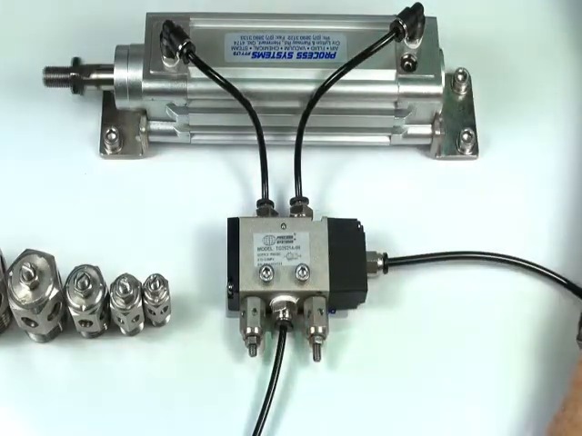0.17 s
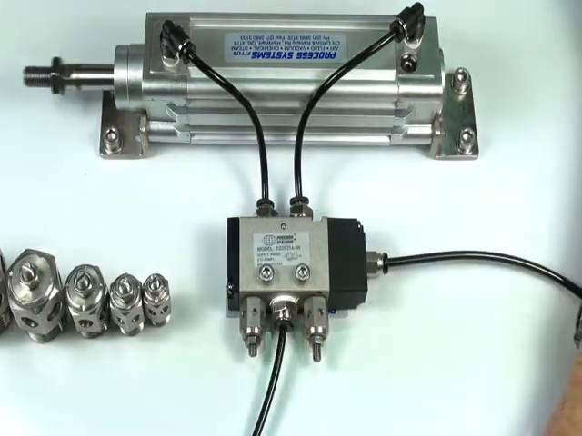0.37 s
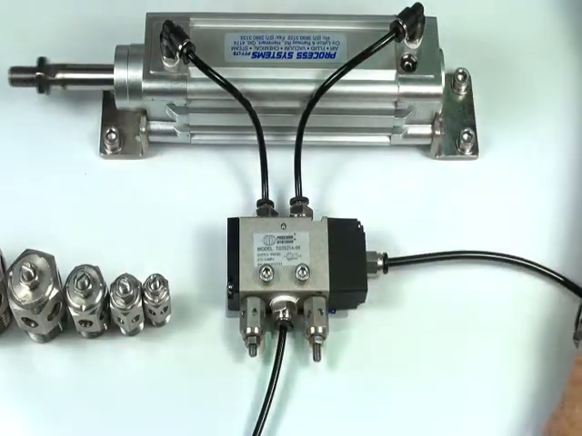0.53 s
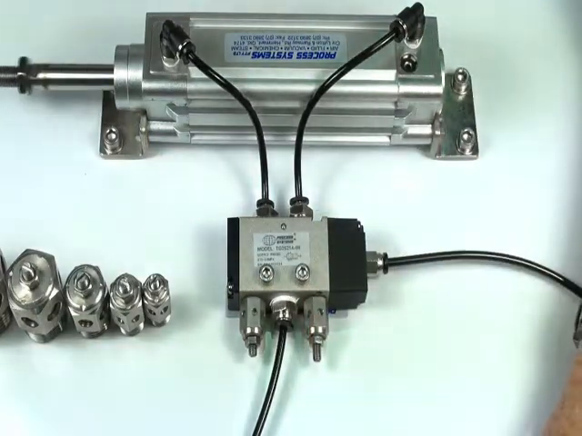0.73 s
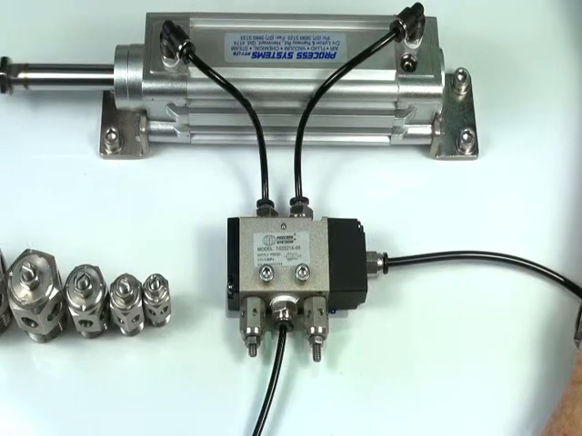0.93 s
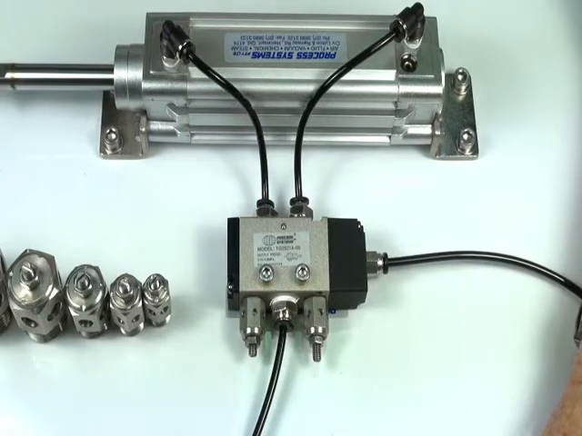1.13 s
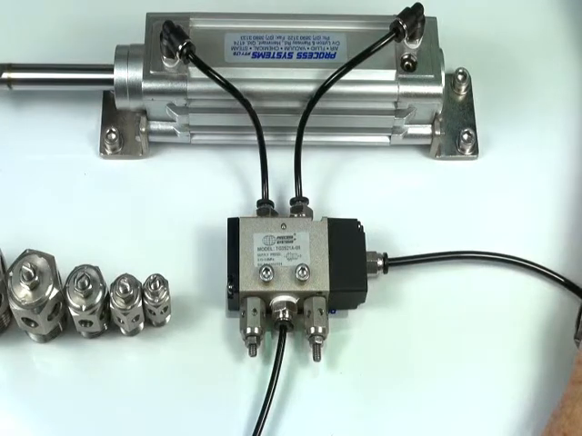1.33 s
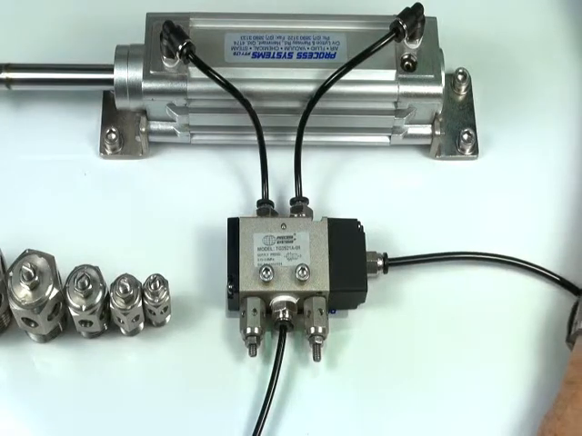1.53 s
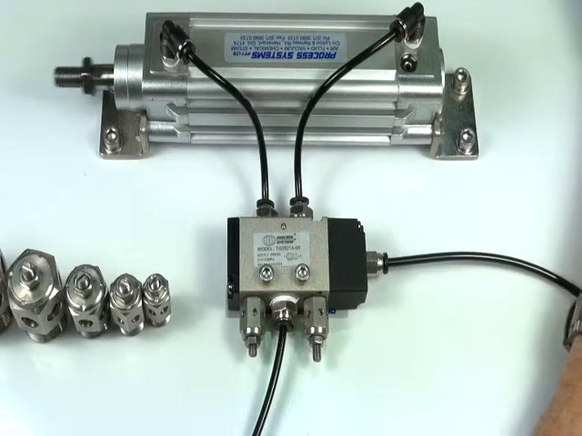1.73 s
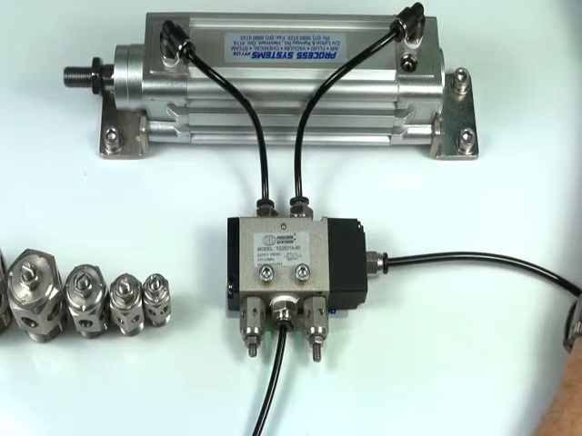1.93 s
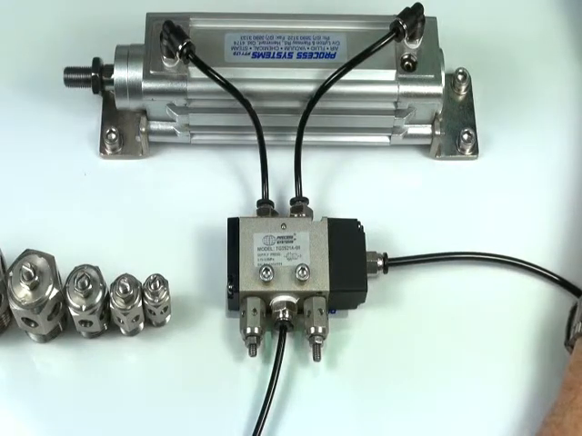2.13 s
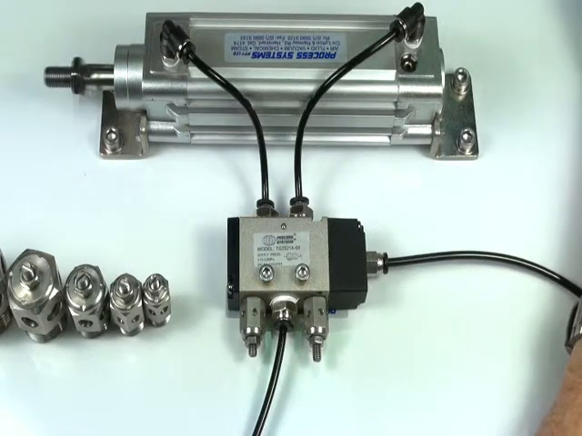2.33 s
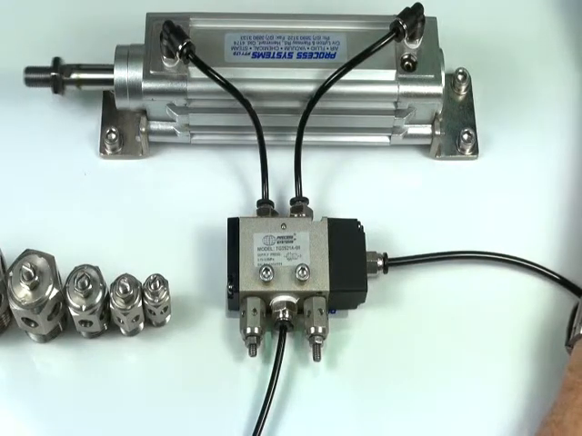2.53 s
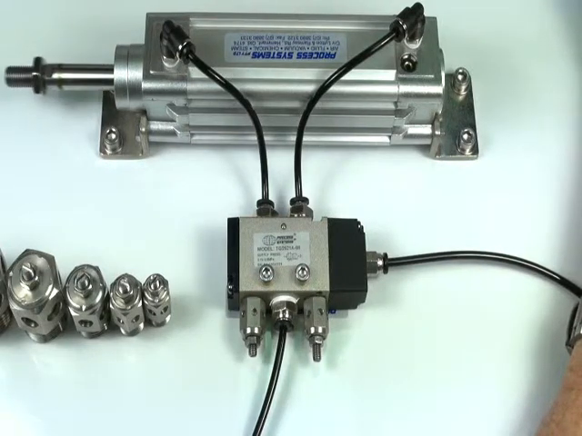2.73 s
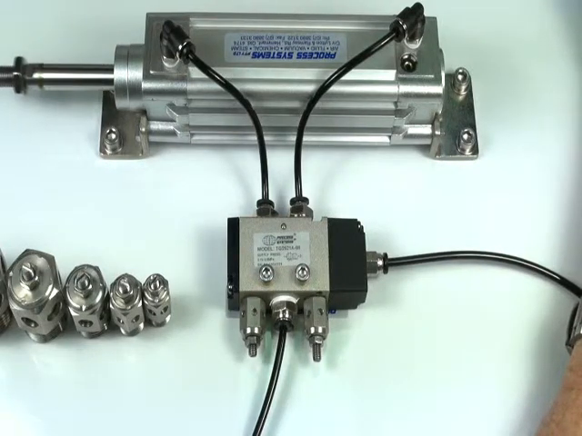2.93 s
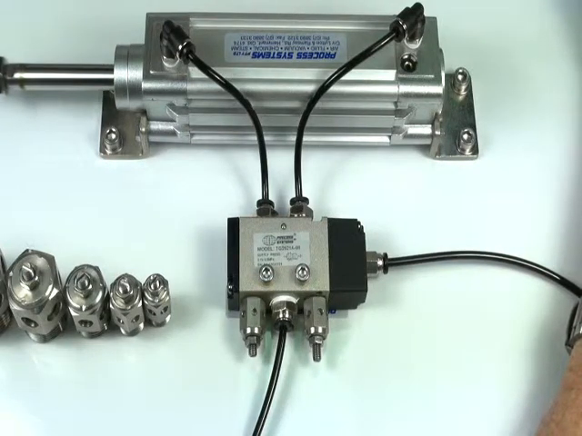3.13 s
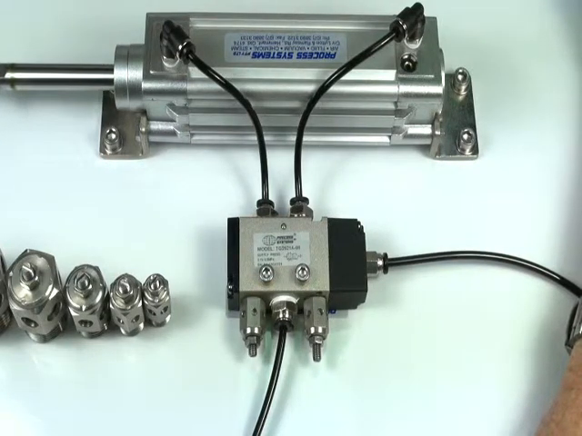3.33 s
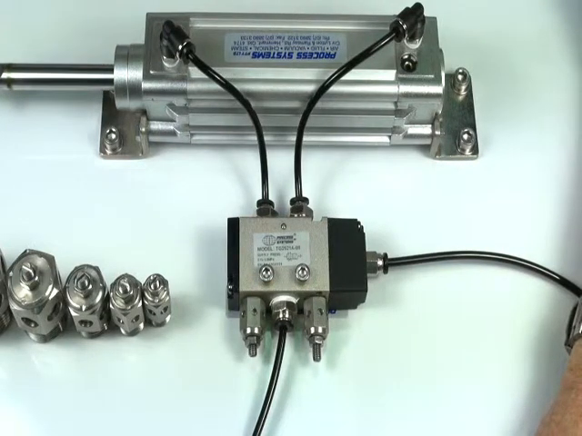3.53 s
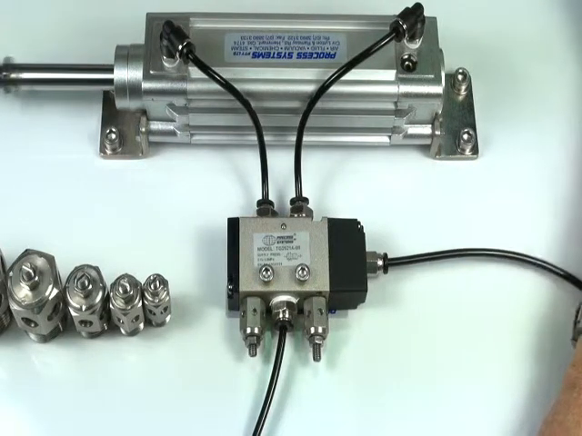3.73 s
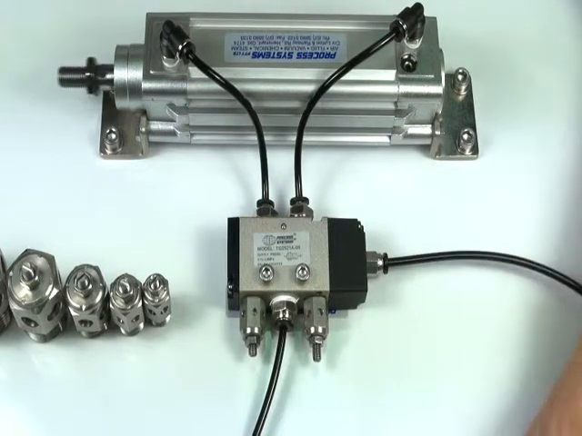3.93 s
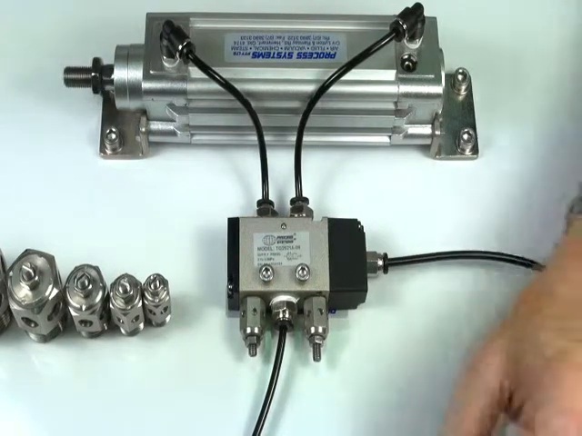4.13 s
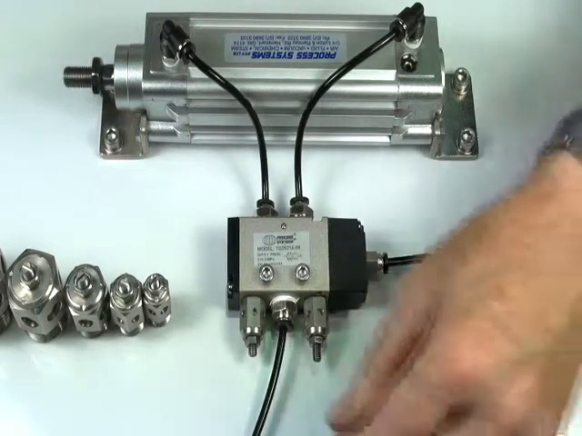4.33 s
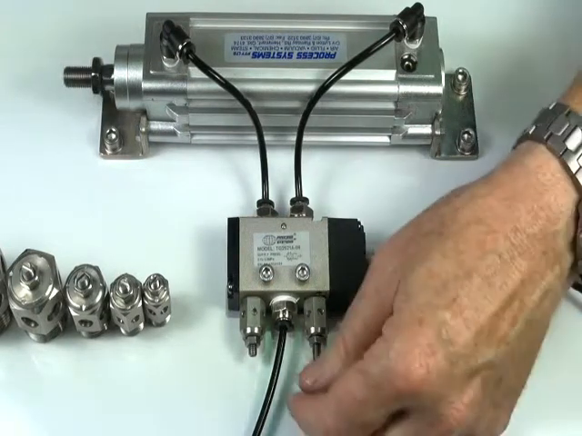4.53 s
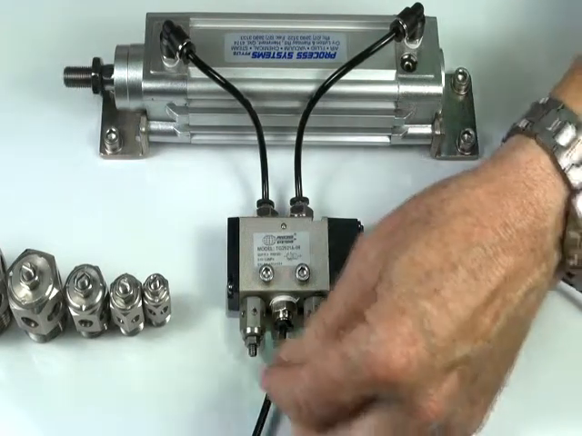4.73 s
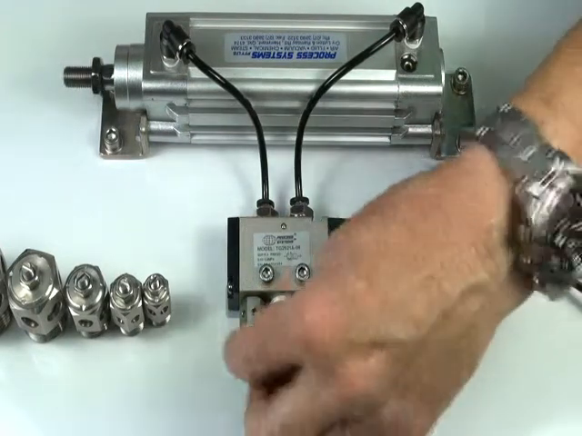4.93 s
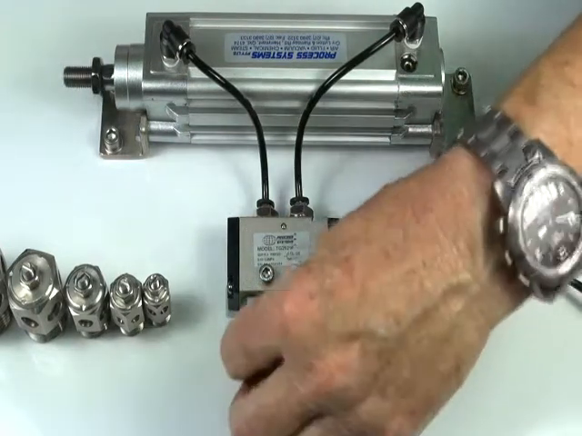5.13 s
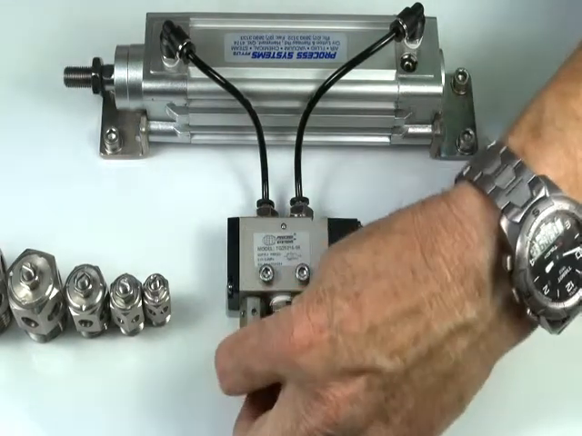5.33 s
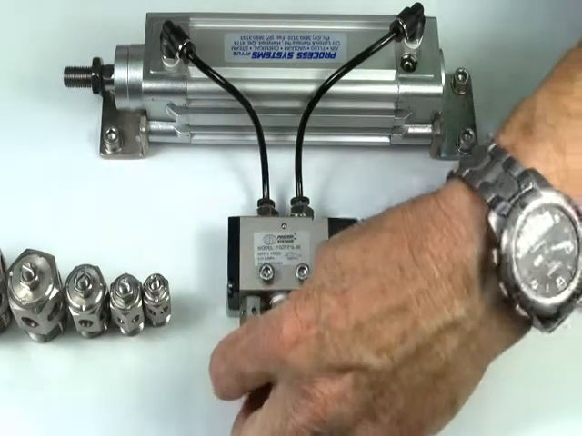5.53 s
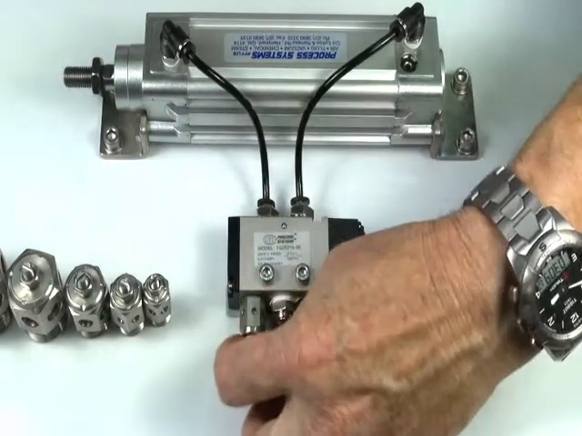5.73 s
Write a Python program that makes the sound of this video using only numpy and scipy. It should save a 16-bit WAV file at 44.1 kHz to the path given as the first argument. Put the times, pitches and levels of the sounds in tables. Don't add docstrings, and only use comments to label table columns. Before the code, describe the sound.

A close view of a pneumatic cylinder and valve on a hollow bench, in a moderately echoing workshop with constant ventilation rumble, low machine drone and very faint lamp buzz. At 0 s a dry pop and clattering knocks start the stroke; a thin, quiet throttled hiss continues to about 1 s, then fades. A small touch at 1.4 s precedes a sharp pilot spit at 1.45, a heavy pop and tick at 1.49, and a loud, swelling, bench-shaking air rush until 1.64. The piston bangs at 1.78 with rattling and a tiny puff. Light ticks come near 2.1; at 2.21 another pop and knock begin the second faint hiss, fading after 3.2. At 3.6 the valve spits and pops, air rushes until 3.8, and a thick cluster of bangs lands at 3.83-3.98 with a short bleeding hiss. From 4 s only room rumble remains, with tiny finger clicks around 4.3, 4.5 and 5.3-5.5.

```python
import sys
import numpy as np
from scipy import signal
from scipy.fft import rfft, irfft
from scipy.io import wavfile

SR = 44100
rng = np.random.default_rng(int(sys.argv[2]) if len(sys.argv) > 2 else 0)


def wav_out(sig):
    wavfile.write(sys.argv[1], SR, np.round(np.clip(np.atleast_2d(sig).T, -1, 1) * 32767).astype(np.int16))


def level_to_linear(level):
    exponent = np.asarray(level, float) / 20
    return 10 ** exponent


N = 254016

# freq_hz, density_db
SHOP_SPECTRUM = [(21, -68.5), (36, -30.5), (70, -28), (84, -18.5), (134, -8.5), (236, -7), (328, -7.5),
                 (466, -9.5), (801, -9.5), (1410, -20.5), (1620, -22.5), (7290, -48), (9900, -67.5),
                 (12900, -77), (21800, -120)]
# freq_hz, width_hz, level_db
DRONES = [(48.5, 2.2, -64), (96.8, 5.4, -56), (141.5, 2.8, -47), (202.1, 1.33, -44), (237.8, 5.6, -42.5),
          (300.2, 2.7, -45), (469.5, 7.6, -46.5), (491.6, 7.9, -55), (676.5, 23, -49), (801, 9.5, -51),
          (1625, 8.7, -57)]
# freq_hz, level_db
LAMP_BUZZ = [(6800, -87), (7100, -74), (7150, -77), (7200, -87), (7250, -87)]
# freq_hz, t60_s
ROOM_T60 = [(150, 0.55), (600, 0.51), (2500, 0.44), (8000, 0.35)]
# start_s, level_db, pitch_hz
TOUCHES = [
    (1.411, -37.5, 885),
    (2.078, -56, 6400),
    (4.258, -61, 2470),
    (4.494, -52, 3000),
    (5.323, -50.5, 7500),
    (5.46, -51, 4060),
]
# start_s, level_db, t60_s, low_modes_db (modes under 2 kHz)
TICKS = [(1.4939, 0.5, 0.0029, -1), (1.78, -25, 0.011, 5), (1.8096, -16, 0.014, -10),
         (2.1110, -13.5, 0.0069, -8), (3.6152, -8, 0.011, -9), (3.6588, -8.5, 0.0045, 2.5),
         (3.751, -25, .008, -12), (3.779, -27, .008, -4), (3.8075, -30, 0.013, -2),
         (3.9739, -14.5, 0.018, 7.5), (3.981, -24, 0.007, 9)]
# freq_hz, level_db
ARMATURE_MODES = [(1050, 9.5), (1330, 1), (1600, 3.5), (1950, 0.5), (2180, 12), (2390, 16), (2620, -4),
                  (2930, -10), (3600, -9), (4200, -20), (5300, -23), (7200, -26)]
# start_s, ring_db, clatter_db, hardness_hz
BLOWS = [(.005, -13, -8.5, 2600), (.024, -22, -10, 2200), (.085, -26, -19, 1500), (.135, -41, -27, 1500),
         (1.758, -34, -19, 3000), (1.7800, -6, -1, 2500), (1.799, -10.5, -10, 1800),
         (1.811, -25, -7.5, 3000), (1.840, -14.5, -13, 1480), (1.869, -23, -21.5, 1500),
         (2.078, -24.5, -29, 700), (2.215, -23.5, -18.5, 2800), (2.234, -30, -15.5, 2000),
         (3.566, -20.5, -28, 706), (3.8304, -8, 0.5, 1550), (3.845, -15, -1.5, 2200),
         (3.874, -9.5, -11, 800), (3.904, -7.5, -21, 800), (3.975, -25.5, -19, 2770)]
# freq_hz, level_db, t60_s
BENCH_MODES = [(239.7, -11, 0.29), (273, -5, 0.14), (320.3, -8.5, 0.41), (381.6, -3, 0.23), (499, 1, 0.17),
               (541.8, 5, 0.15), (605.6, 4, 0.15), (706, -1.5, 0.067), (783, -4, 0.29), (842, -9, 0.18),
               (1129, -6.5, 0.14), (1536, -0.5, 0.087), (2200, -9.5, .035), (2450, -7.5, 0.059)]
# freq_hz, level_db, t60_s
CLATTER_BANDS = [(245, -18.5, 0.34), (328, -10.5, 0.62), (488, 6, 0.13), (800, 0.5, 0.28),
                 (1190, 3.5, 0.11), (1800, -1, 0.18), (2635, -1.5, 0.11), (3320, -23.5, 0.37),
                 (5000, -42, .2)]
# start_s, level_db
POPS_OUT = [
    (.0019, -5),
    (2.2119, -5.5),
]
# freq_hz, level_db, t60_s
POP_OUT_MODES = [(670, 0, 0.0042), (2133, -12.5, 0.0086), (1810, -23, 0.017), (4650, -39, 0.019)]
# start_s, level_db
POPS_BACK = [
    (1.4869, 3.8),
    (3.6503, 1.8),
]
# freq_hz, level_db, t60_s
POP_BACK_MODES = [(517, 0.5, 0.0036), (1450, -30.5, 0.0067)]
# open_s, shut_s, level_db, spit_s
PILOTS = [
    (1.45, 1.492, -13.5, 0.013),
    (3.607, 3.652, -17, 0.01),
]
# freq_hz, density_db
PILOT_SPECTRUM = [(290, -53), (500, -7.5), (1830, -5), (2350, -31), (3340, -15.5), (4030, 5.5), (4680, -12),
                  (6080, -13.5), (9900, -28), (12900, -66), (21800, -120)]
# freq_hz, width_hz, level_db
PILOT_PEAKS = [(2320, 550, 2.5), (4000, 460, -21.5), (5900, 420, -10.5)]
# open_s, full_reach_s, shut_s, level_db
OUT_STROKES = [
    (-.03, 1.042, 2, -45),
    (2.207, 3.21, 3.604, -45),
]
# freq_hz, density_db
CREEP_SPECTRUM = [(710, -18), (1200, 1.5), (1930, 0.5), (2290, -16), (2660, -6.5), (3490, -0.5),
                  (4170, -4.5), (4800, -2), (7600, -11), (9900, -30.5), (12900, -62), (21800, -120)]
# freq_hz, width_hz, level_db
CREEP_PEAKS = [(2236, 400, -4), (3550, 71, -15.5), (4800, 260, -11.5), (5650, 310, -14.5)]
# open_s, build_s, stop_s, level_db, rumble_db (re hiss)
RETURNS = [
    (1.488, 0.11, 1.642, -21, -7.5),
    (3.656, 0.15, 3.816, -26, -8),
]
# start_s, length_s, level_db, sag_db_s,
# rumble_db (re hiss)
BLEEDS = [
    (1.708, 0.081, -49.5, 7, -2),
    (1.781, .02, -33.5, 397, 9),
    (3.65, .004, -28, 898, -11.5),
    (3.835, 0.1, -30.5, 108, -19),
]
# freq_hz, density_db
RUSH_SPECTRUM = [(530, -56), (900, -15), (1360, -13), (1950, -0.5), (2150, -9.5), (2690, -3.5),
                 (3030, -9.5), (4950, -8.5), (6900, -15.5), (9510, -32), (9900, -50), (12900, -53.5),
                 (21800, -120)]
# freq_hz, width_hz, level_db
RUSH_PEAKS = [(2310, 380, -2), (3840, 410, -10), (5000, 460, -17)]
# freq_hz, density_db
RUMBLE_SPECTRUM = [(59, -46), (100, -49), (150, -5.5), (403, -2), (489, -0.5), (547, -5.5), (769, -2),
                   (1500, -9.5), (1950, -21.5), (3300, -120)]

SHOP_DB = -35
ROOM_DB, ROOM_ONSET_S = -13, 0.013
RUSH_FLUTTER_DB, CALM_FLUTTER_DB = 1.0, 0.4
PILOT_ATTACK_S, SPIT_DB, PILOT_SAG_DB_S = 0.0085, 7.5, 119.5
CREEP_ATTACK_S, CREEP_SURGE_DB, CREEP_SURGE_S, CREEP_SAG_DB_S = 0.0037, 1, 0.017, 30.5
BUILD_DB, RUSH_RELEASE_DB_S, BLEED_RELEASE_DB_S = 12.5, 598, 245
SQUEEZE_DB, RELEASE_DB_S, LIMIT = -9, 170, 0.8
GAP_HZ, TOP_HZ = (9950, 10450), 13800


def at_hz(points, hz):
    table_hz, values = np.array(points).T
    return np.interp(np.log(hz + 1), np.log(table_hz), values)


def rms_one(x):
    return x / np.sqrt(np.mean(x ** 2) + 1e-20)


def band_pass(x, low_hz, high_hz):
    return signal.sosfilt(signal.butter(2, [low_hz, high_hz], "band", fs=SR, output="sos"), x)


def drift(rate_hz):
    pole = np.exp(-80 * np.pi * rate_hz / SR)
    noise = rng.standard_normal(N // 40 + 2002)
    slow = signal.lfilter([1], [1, -2 * pole, pole * pole], noise)[2000:]
    return np.interp(np.arange(N) / 40, np.arange(len(slow)), rms_one(slow))


def coloured(spectrum, top_db=-90):
    hz = np.fft.rfftfreq(N, 1 / SR)
    shape_db = np.where(hz < GAP_HZ[1], at_hz(spectrum, hz), top_db)
    return rms_one(irfft(rfft(rng.standard_normal(N)) * level_to_linear(shape_db), N))


def whistles(peaks):
    hz, power = np.fft.rfftfreq(N, 1 / SR), 0
    for centre_hz, width_hz, level_db in peaks:
        hump = 1 / (1 + ((hz - centre_hz) / (width_hz / 2)) ** 2) ** 2
        power = power + level_to_linear(2 * level_db) * hump / np.mean(hump)
    return irfft(rfft(rng.standard_normal(N)) * np.sqrt(power), N)


def click(length_s):
    return np.r_[1., np.zeros(round(length_s * SR))]


def judder(decay_s):
    t = np.arange(round(0.6 * SR)) / SR
    pushes = 0.06 * rng.standard_normal(len(t)) * np.exp(-t / decay_s)
    return click(0.6)[:-1] + pushes


def ring(push, hz, t60_s):
    radius, angle = level_to_linear(-60 / (t60_s * SR)), 2 * np.pi * hz / SR
    denominator = [1, -2 * radius * np.cos(angle), radius * radius]
    return signal.lfilter([0, np.sin(angle)], denominator, push + 1e-18)


def add(track, start_s, x):
    i = round(start_s * SR)
    track[i:i + len(x)] += x[:N - i]


def workshop():
    t = np.arange(N) / SR
    tones = sum(level_to_linear(level_db) * np.sin(2 * np.pi * hz * t + k) for k, (hz, level_db) in enumerate(LAMP_BUZZ))
    buzz = level_to_linear(0.5 + 1.5 * drift(8)) * tones
    swell = level_to_linear(0.6 * drift(4))
    return level_to_linear(SHOP_DB) * swell * coloured(SHOP_SPECTRUM, top_db=-72) + whistles(DRONES) + buzz


def room(x):
    t, echo = np.arange(SR) / SR, 0
    for low_hz in 90 * 2. ** np.arange(7):
        band = band_pass(rng.standard_normal(SR), low_hz, 2 * low_hz)
        echo = echo + band * level_to_linear(-60 * t / at_hz(ROOM_T60, low_hz * np.sqrt(2)))
    echo *= 1 - np.exp(-(t / ROOM_ONSET_S) ** 2)
    return signal.fftconvolve(x, echo / np.sqrt(np.sum(echo ** 2)))[:N]


def touches():
    out = np.zeros(N)
    for start_s, level_db, hz in TOUCHES:
        modes = sum(ring(click(0.03), hz * ratio, 0.0092) for ratio in (0.82, 0.91, 1, 1.08, 1.15))
        add(out, start_s, level_to_linear(level_db + 2.5) * modes)
    return band_pass(out, 600, 9500)


def ticks():
    out = np.zeros(N)
    for start_s, tick_db, t60_s, low_modes_db in TICKS:
        push = judder(t60_s / 1.4)[:SR // 8]
        for k, (hz, mode_db) in enumerate(ARMATURE_MODES):
            level_db = tick_db + mode_db - 8 + low_modes_db * (hz < 2000)
            add(out, start_s, level_to_linear(level_db) * ring(push, hz, t60_s) * (-1) ** k)
    return out


def bench():
    out, t = np.zeros(N), np.arange(round(0.6 * SR)) / SR
    for start_s, ring_db, clatter_db, hardness_hz in BLOWS:
        push = judder(0.013)
        modes = 0
        for k, (hz, level_db, t60_s) in enumerate(BENCH_MODES):
            modes = modes + level_to_linear(level_db - 4) * ring(push, hz, t60_s) * (-1) ** k
        white = rng.standard_normal(len(t))
        clatter = 0
        for hz, level_db, t60_s in CLATTER_BANDS:
            band = rms_one(band_pass(white, hz / 1.22, hz * 1.22))
            clatter = clatter + band * level_to_linear(level_db - 6 - 60 * t / t60_s)
        clatter = clatter * (1 - np.exp(-t / 0.001))
        contact = signal.butter(2, hardness_hz, fs=SR, output="sos")
        add(out, start_s, signal.sosfilt(contact, level_to_linear(ring_db) * modes + level_to_linear(clatter_db) * clatter))
    return out


def pops():
    out = np.zeros(N)
    for events, modes, swell_s in ((POPS_OUT, POP_OUT_MODES, 0.0011), (POPS_BACK, POP_BACK_MODES, 0.0016)):
        wavelet = sum(level_to_linear(level_db) * ring(click(0.05), hz, t60_s) for hz, level_db, t60_s in modes)
        wavelet *= 1 - np.exp(-(np.arange(len(wavelet)) / (swell_s * SR)) ** 2)
        for start_s, level_db in events:
            add(out, start_s, level_to_linear(level_db + 25.5) * wavelet)
    return out


def puff(open_s, shut_s, attack_s, release_db_s):
    since_s = np.arange(N) / SR - open_s
    fall_db = release_db_s * np.maximum(since_s - (shut_s - open_s), 0)
    opening = np.clip(since_s / attack_s, 0, 1) ** 2
    return np.maximum(since_s, 0), opening * level_to_linear(-np.minimum(fall_db, 200))


def pilot_flow():
    flow = 0
    for open_s, shut_s, level_db, spit_s in PILOTS:
        since_s, gain = puff(open_s, shut_s, PILOT_ATTACK_S, release_db_s=9001)
        spit_db = SPIT_DB * np.exp(-(since_s / spit_s) ** 4)
        flow = flow + gain * level_to_linear(level_db + spit_db - PILOT_SAG_DB_S * since_s)
    return flow


def creep_flow():
    flow = 0
    for open_s, full_reach_s, shut_s, level_db in OUT_STROKES:
        since_s, gain = puff(open_s, shut_s, CREEP_ATTACK_S, release_db_s=1998)
        surge_db = CREEP_SURGE_DB * np.exp(-since_s / CREEP_SURGE_S)
        sag_db = CREEP_SAG_DB_S * np.maximum(since_s - (full_reach_s - open_s), 0)
        flow = flow + gain * level_to_linear(level_db + surge_db - sag_db)
    return flow


def rush_flow():
    flows = []
    for open_s, build_s, stop_s, level_db, rumble_db in RETURNS:
        since_s, gain = puff(open_s, stop_s, 0.0034, RUSH_RELEASE_DB_S)
        lag_db = BUILD_DB * np.maximum(1 - since_s / build_s, 0)
        flows.append((gain * level_to_linear(level_db - lag_db), rumble_db))
    for start_s, length_s, level_db, sag_db_s, rumble_db in BLEEDS:
        since_s, gain = puff(start_s, start_s + length_s, 0.0013, BLEED_RELEASE_DB_S)
        sag_db = sag_db_s * np.minimum(since_s, length_s)
        flows.append((gain * level_to_linear(level_db - sag_db), rumble_db))
    hiss = sum(flow for flow, _ in flows)
    shake = sum(flow * level_to_linear(rumble_db) for flow, rumble_db in flows)
    return hiss, shake


def jet(spectrum, peaks, top_db, flutter_db):
    return rms_one(coloured(spectrum, top_db) + whistles(peaks)) * level_to_linear(flutter_db * drift(16))


def exhausts():
    hiss, shake = rush_flow()
    pilot = pilot_flow() * jet(PILOT_SPECTRUM, PILOT_PEAKS, top_db=-29.5, flutter_db=CALM_FLUTTER_DB)
    creep = creep_flow() * level_to_linear(4) * jet(CREEP_SPECTRUM, CREEP_PEAKS, top_db=-33, flutter_db=CALM_FLUTTER_DB)
    rush = hiss * level_to_linear(7) * jet(RUSH_SPECTRUM, RUSH_PEAKS, top_db=-38, flutter_db=RUSH_FLUTTER_DB)
    rumble = shake * level_to_linear(11.5 + 3.1 * drift(40)) * coloured(RUMBLE_SPECTRUM)
    return pilot + creep + rush + rumble


def scene():
    knocks = band_pass(band_pass(pops() + bench() + ticks(), 110, 6200), 130, 5200)
    rig = exhausts() + knocks + touches()
    return (rig + level_to_linear(ROOM_DB) * room(rig) + workshop())[None]


def band_limit(x):
    return signal.sosfilt(signal.butter(12, 13810, fs=SR, output="sos"), x)


def record(dry):
    over_db = np.maximum(20 * np.log10(np.abs(dry[0]) + 1e-9) - SQUEEZE_DB, 0)
    fall_db = RELEASE_DB_S * np.arange(N) / SR
    held_db = np.maximum.accumulate(over_db + fall_db) - fall_db
    x = dry * level_to_linear(-0.6 * signal.lfilter([0.04], [1, -0.96], held_db))
    x = x / (1 + (np.abs(x) / LIMIT) ** 6) ** (1 / 6)
    x = signal.sosfilt(signal.cheby2(6, 45, GAP_HZ, "bandstop", fs=SR, output="sos"), x)
    x = signal.sosfilt(signal.cheby2(12, 60, TOP_HZ + 350, fs=SR, output="sos"), x)
    return band_limit(x)


dry = scene()
out = record(dry)
wav_out(out)
```